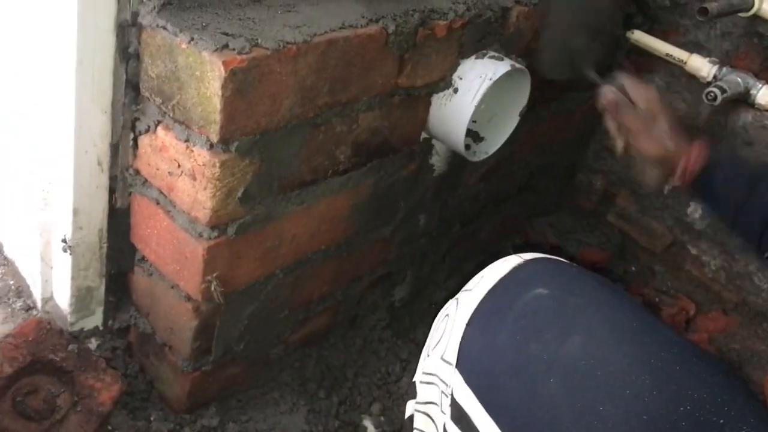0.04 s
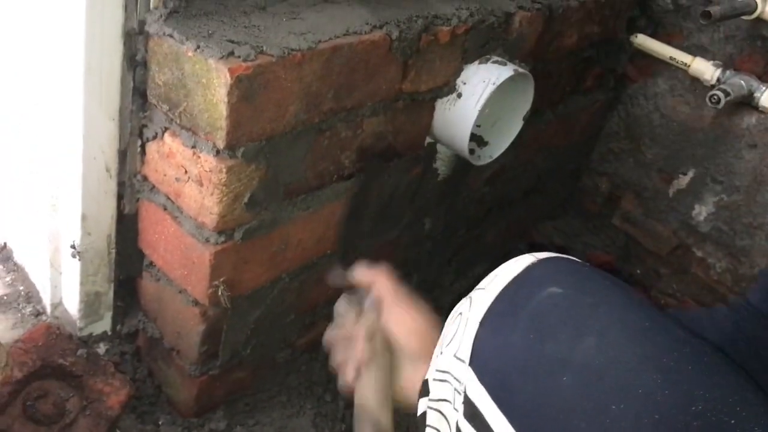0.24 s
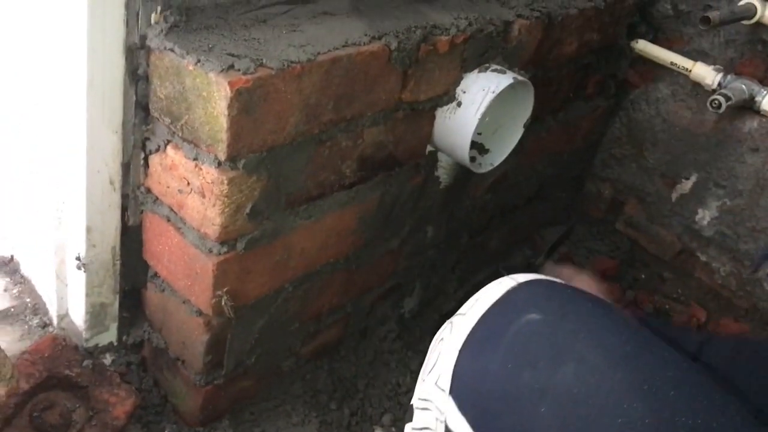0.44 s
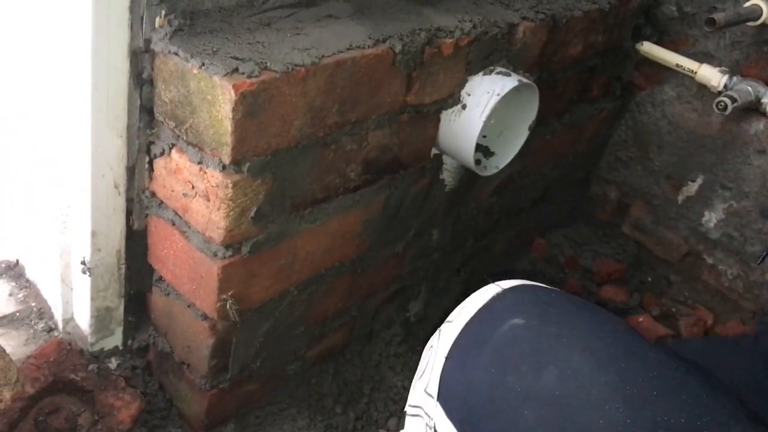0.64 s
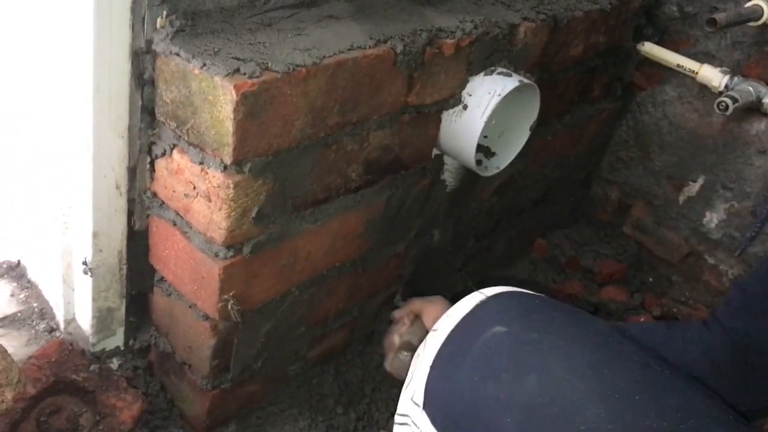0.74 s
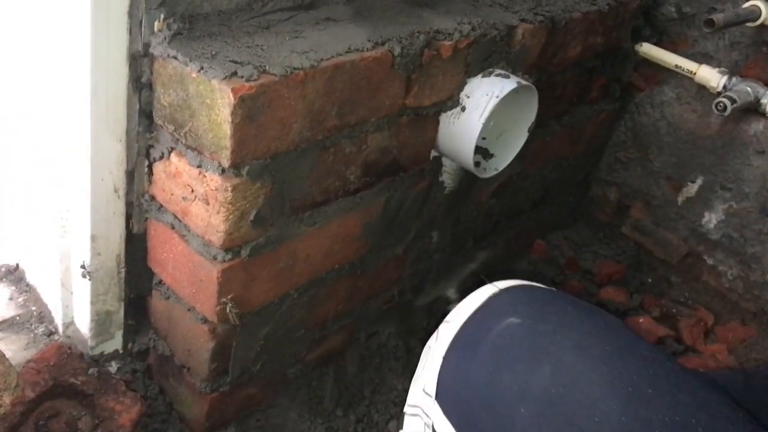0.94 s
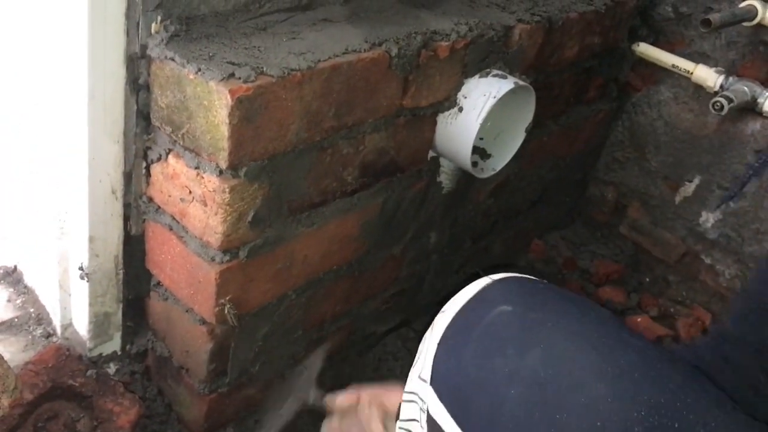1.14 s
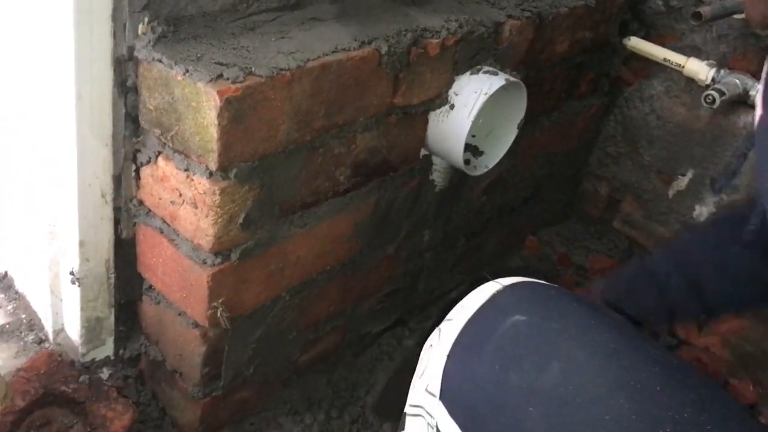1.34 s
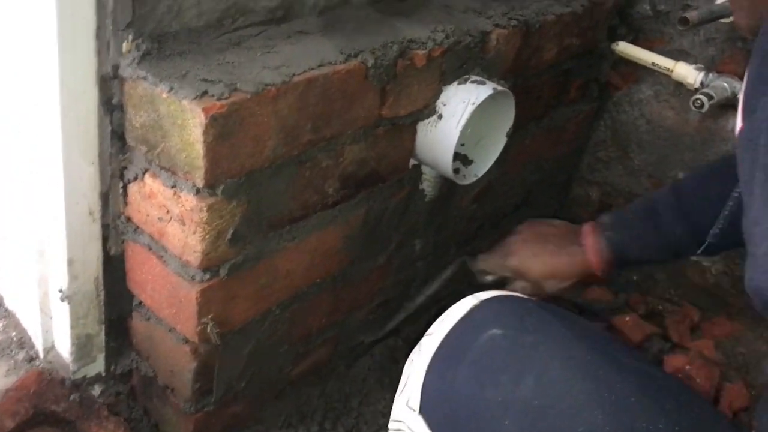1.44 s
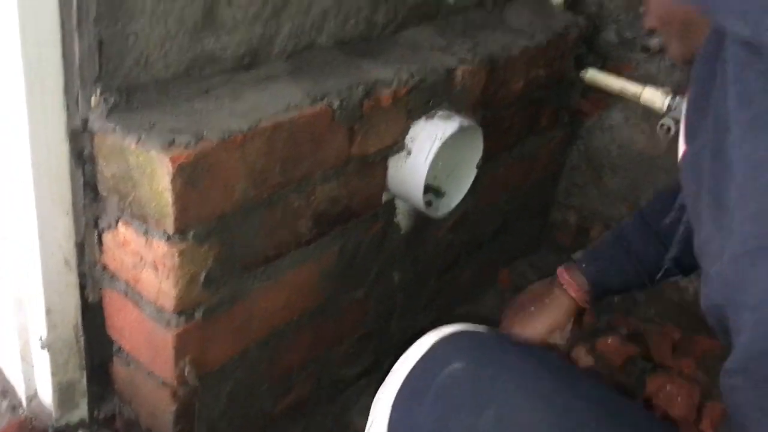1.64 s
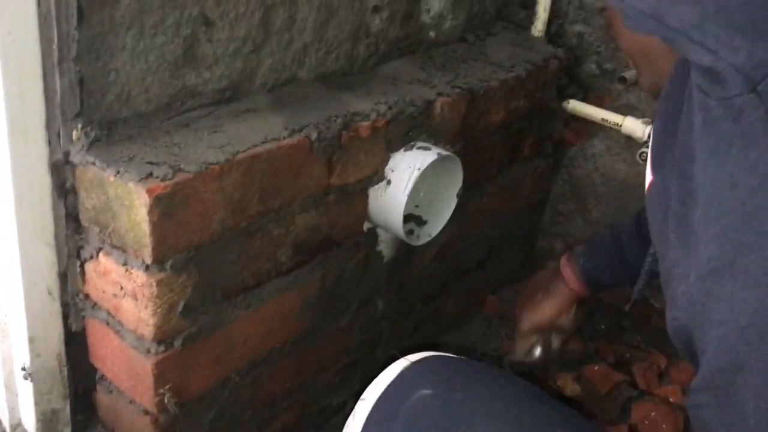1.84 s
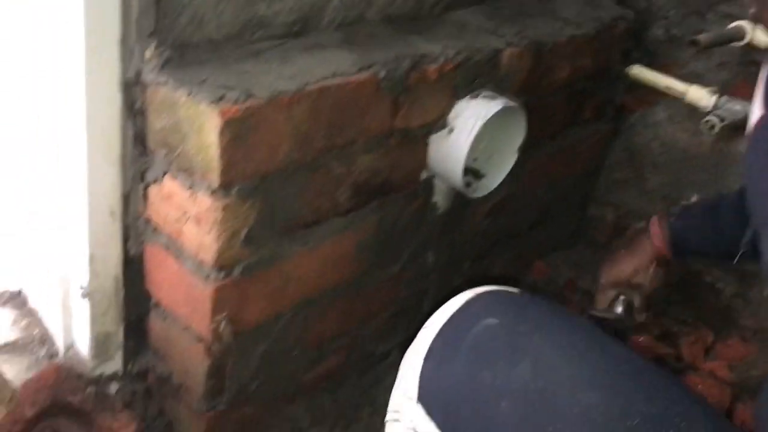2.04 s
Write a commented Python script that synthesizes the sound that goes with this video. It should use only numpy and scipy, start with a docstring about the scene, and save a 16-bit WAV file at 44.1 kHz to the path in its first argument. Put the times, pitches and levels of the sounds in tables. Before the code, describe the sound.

Trowel scraping wet sandy mortar on brick, one loud early stroke, then shorter, fainter scrapes and ticks.

```python
"""In a small bare room, a steel trowel scrapes gritty wet mortar along brickwork in short strokes.
Filtered noise makes the hiss of sand and the body of the mortar; sparse random grains excite the
resonant modes of the blade. Its edge knocks on brick as bursts of noise. Short tones, most of them
rough, swell and die; three in a row step down from 602 to 361 Hz as a falling pitch. Short dull
reverberation follows; a wavering low hum and faint hiss lie beneath."""
import sys
import numpy as np
from scipy import signal
from scipy.fft import rfft, irfft
from scipy.io import wavfile
from scipy.ndimage import uniform_filter1d

SR = 44100
rng = np.random.default_rng(int(sys.argv[2]) if len(sys.argv) > 2 else 0)


def store_pcm(level_fs):
    """Save levels as 16-bit WAV."""
    pcm = np.round(np.clip(level_fs, -1, 1) * 32767).astype(np.int16)
    wavfile.write(sys.argv[1], SR, np.atleast_2d(pcm).T)


N = 92610  # length in samples


def amp(db):
    """Decibels are a logarithm of amplitude: 20 dB is a factor of ten."""
    return 10 ** (np.asarray(db) / 20)


def evened(x):
    """Normalises by root mean square, the measure of signal power."""
    return x / np.sqrt(np.mean(x ** 2) + 1e-20)


def along(table, col):
    """Linear interpolation reads a column of a time table at every sample."""
    rows = np.array(table)
    return np.interp(np.arange(N) / SR, rows[:, 0], rows[:, col])


def smoothed(x, length_s):
    """Two moving averages in series act as a low-pass filter along the last axis."""
    size = max(round(length_s * SR), 1)
    return uniform_filter1d(uniform_filter1d(x, size), size)


def wander(length_s):
    """Low-pass filtered noise is a slow random fluctuation, here of rms 1."""
    return evened(smoothed(rng.standard_normal(N), length_s))


def coloured(x, points, lo_hz, hi_hz):
    """Spectral weighting shapes x; the part between lo_hz and hi_hz has rms 1."""
    hz = np.fft.rfftfreq(N, 1 / SR)
    point_hz, point_db = np.transpose(points)
    weight_db = np.interp(np.log(hz + 1), np.log(point_hz + 1), point_db, left=-60)
    spectrum = rfft(x) * amp(weight_db)
    band = irfft(spectrum * ((hz > lo_hz) & (hz < hi_hz)), N)
    return irfft(spectrum, N) / np.sqrt(np.mean(band ** 2))


def resonate(x, hz, width):
    """A damped oscillator is a pole pair whose radius sets the bandwidth (width in Hz)."""
    r = np.exp(-np.pi * width / SR)
    angle = 2 * np.pi * hz / SR
    return signal.lfilter([1 - r], [1, -2 * r * np.cos(angle), r * r], x) * 2 * np.sin(angle)


def add(mix, s, sound):
    """Superposition: sounds sum linearly, this one from s seconds on."""
    part = mix[round(s * SR):][:len(sound)]
    part += sound[:len(part)]


def background():
    """Frequency modulation wavers a low hum; narrow-band noise blurs it and its overtone, over hiss."""
    # Each row: time in seconds, hum level in dB, overtone level relative to the hum tone in dB.
    hum_levels = [(0, -55.5, 12), (.06, -57, -21), (.13, -83, 16), (.23, -59.5, -2), (.32, -75.5, 17),
                  (.75, -65, -31), (1.3, -70.5, -9), (1.68, -61, -3.5), (1.94, -62.5, -9.5),
                  (2.1, -69.5, 4)]
    # Spectrum of the faint hiss. Each row: frequency in Hz, relative density in dB per Hz.
    air_spectrum = [(30, 0), (60, -9.5), (140, -3.5), (300, -7.5), (1730, -17), (3500, -23), (5910, -26.5),
                    (14000, -33.5)]
    hum_hz, waver_hz, waver_s = 116.2, 10.33, 0.023  # centre, rms deviation, smoothing time
    fuzz_db, fuzz_width_hz = -4, 28  # relative to the hum tone
    overtone_hz, overtone_width_hz = 220, 17.5
    air_db = -65.5  # rms between 193 and 16000 Hz
    air_noise, fuzz_noise, overtone_noise = rng.standard_normal((3, N))
    phase = 2 * np.pi * np.cumsum(hum_hz + waver_hz * wander(waver_s)) / SR
    tone = np.sqrt(2) * np.sin(phase)
    fuzz = amp(fuzz_db) * evened(resonate(fuzz_noise, hum_hz, fuzz_width_hz))
    overtone = evened(resonate(overtone_noise, overtone_hz, overtone_width_hz))
    hum = tone + fuzz + amp(along(hum_levels, 2)) * overtone
    air = amp(air_db) * coloured(air_noise, air_spectrum, 193, 16000)
    return air + amp(along(hum_levels, 1)) * hum


def pressure():
    """Friction noise exists only during contact: gives its level in dB, sudden at each touch."""
    # One table per stroke, from the touch of the blade.
    # Each row: time in seconds, level of the grit hiss in dB.
    strokes = [
        [(0, -69.5), (.035, -65), (.05, -54), (.068, -66.5), (.085, -74), (.161, -67)],
        [(.1615, -52), (.205, -46), (.215, -46.5), (.245, -45.5), (.26, -42.5), (.295, -45.5), (.33, -69.5),
         (.39, -81.5)],
        [(.5605, -59.5), (.59, -66), (.597, -59), (.612, -51), (.65, -55.5), (.665, -63.5), (.71, -59.5),
         (.742, -66), (.77, -57), (.83, -55.5), (.837, -53.5), (.855, -45), (.875, -48), (.905, -54.5),
         (.935, -68.5), (.97, -80)],
        [(1.014, -70.5), (1.038, -70)],
        [(1.0415, -60.5), (1.06, -52.5), (1.085, -47.5), (1.135, -60.5), (1.175, -75.5)],
        [(1.368, -78), (1.392, -73), (1.43, -79.5), (1.47, -78), (1.495, -83)],
        [(1.497, -73), (1.518, -63.5), (1.535, -72), (1.545, -67), (1.5765, -77)],
        [(1.577, -70), (1.6, -61), (1.614, -56), (1.635, -54.5), (1.665, -73.5), (1.7, -91)],
        [(1.748, -66.5), (1.81, -69.5), (1.8335, -62)],
        [(1.834, -50.5), (1.845, -57), (1.86, -63), (1.91, -91.5)],
        [(1.947, -65.5), (1.975, -74), (2.0105, -71.5)],
        [(2.011, -63), (2.022, -61), (2.036, -66), (2.07, -84)],
    ]
    t, db = np.arange(N) / SR, np.full(N, -120.)
    for stroke in strokes:
        s, level = np.transpose(stroke)
        db = np.maximum(db, np.interp(t, s, level, left=-120, right=-120))
    return db


def grains(per_s):
    """Shot noise: sand grains break loose at random instants, a few of them large."""
    spread_db = 1.0
    size = amp(spread_db * np.minimum(rng.exponential(1, N), 4))
    breaks_loose = rng.random(N) < per_s / SR
    return evened(size * rng.standard_normal(N) * breaks_loose)


def blade(push, lo_hz, hi_hz):
    """Modal excitation: each mode's drive varies as the point of contact moves along the steel."""
    # Modes of the steel. Each row: frequency in Hz, relative drive in dB.
    steel_modes = [(1850, -3.5), (2050, 1.5), (2300, -5.5), (2450, -2.5), (2700, -16.5), (2840, -2),
                   (3390, -15), (3900, -11.5), (4745, -3), (5750, -8), (6430, -7.5), (6920, -7)]
    # Decay, shorter while pressed or loaded with mortar; first row free, last row loaded.
    # Each row: time in seconds, time to fall 60 dB in seconds.
    blade_decay = [(0, .09), (.16, .02), (.25, .03), (.31, .09), (.55, .035), (1.3, .018)]
    wander_db, wander_s = 3.2, .015  # rms variation of each drive and its smoothing time
    ring_share = 0.76  # amplitude share of ringing; the rest is band-passed push
    modes = [m for m in steel_modes if lo_hz < m[0] < hi_hz]
    free, loaded = blade_decay[0][1], blade_decay[-1][1]
    freedom = np.clip((along(blade_decay, 1) - loaded) / (free - loaded + 1e-9), 0, 1)
    ring = 0
    for hz, db in modes:
        drive = push * amp(db + wander_db * wander(wander_s) - wander_db)
        for t60, part in ((free, freedom), (loaded, 1 - freedom)):
            width = np.log(1000) / np.pi / t60
            level = np.sqrt(t60 * SR / np.log(1000))  # offsets the lower power of a narrow band
            ring = ring + resonate(drive * np.sqrt(part), hz, width) * level
    sos = signal.butter(3, [lo_hz, hi_hz], "bandpass", fs=SR, output="sos")
    direct = signal.sosfilt(sos, push) * np.sqrt(SR / 2 / (hi_hz - lo_hz))
    return ring_share * ring / np.sqrt(len(modes)) + (1 - ring_share) * direct


def patchy(x, db, size):
    """Time-varying filtering: colour shifts in random patches of time and pitch as contact moves."""
    overlap = size - size // 4
    z = signal.stft(x, nperseg=size, noverlap=overlap)[2]
    field = rng.standard_normal(z.shape[::-1]).T
    field = uniform_filter1d(field, size=3, axis=0)  # across frequency
    field = uniform_filter1d(field, size=8, axis=1)  # across time
    gain = amp(db * evened(field))
    return signal.istft(z * evened(gain), nperseg=size, noverlap=overlap)[1][:N]


def scrape():
    """Friction excitation: grains hiss, shake the blade's modes and the lump of mortar."""
    # Spectra of the hiss and of the mortar. Each row: frequency in Hz, relative density in dB per Hz.
    grit_spectrum = [(2500, -3.5), (4200, -9.5), (5600, -3), (9800, -10), (13100, -8.5), (15600, -11)]
    mortar_spectrum = [(150, -8), (296, 0.5), (436, 3), (616, 7.5), (770, -2), (934, 3), (1290, 7.5),
                       (1700, -20.5), (2210, -55)]
    # What the grit shakes. Each row: time in seconds, then levels relative to the hiss in dB of
    # the upper blade drive, the lower blade drive and the mortar body.
    shaken = [(0, -13, 1.5, 17.5), (.05, 5.5, 3, 2.5), (.14, -4, 13, 11), (.17, 13.5, 5, -5),
              (.21, 5, 5, -8.5), (.23, 9, 12, 1), (.26, 7, 8.5, -16), (.3, 14.5, 4.5, 1),
              (.34, 17.5, 17, 5.5), (.56, 9, 4, 3), (.62, 5, 11, -2.5), (.7, 6.5, 7, 0), (.77, -1, 5.5, -5),
              (.82, 7, 12, -14), (.85, -4, 3, -34), (.88, 12.5, 12.5, -2), (1.02, -19, 5, 1),
              (1.08, 6.5, -0.5, -16.5), (1.14, -12, -9, -8), (1.4, 2, 11.5, 4.5), (1.51, 13.5, 9.5, 1),
              (1.57, 3, 13, -2), (1.62, 8, 10.5, 3), (1.76, -9, 8.5, -9), (1.82, -7, 14.5, -1),
              (1.85, -29, 11, 4.5), (1.9, -14, 17.5, 19), (1.96, -3, 2, -4), (2.02, 3, 9, 3)]
    grains_per_s, stones_per_s = 22000, 1500  # stones: the coarser grains that jolt the blade
    split_hz = 3750  # between lower and upper blade modes
    hiss_patch_db, body_patch_db = 3, 1.5  # rms unevenness of colour
    hiss_db = pressure()
    hiss = coloured(grains(grains_per_s), grit_spectrum, 7500, 15000)
    out = amp(hiss_db) * patchy(hiss, hiss_patch_db, size=256)
    upper_push = amp(hiss_db + along(shaken, 1)) * grains(2 * stones_per_s)
    out += blade(upper_push, split_hz, 7300)
    lower_push = amp(hiss_db + along(shaken, 2)) * grains(stones_per_s)
    out += blade(lower_push, 1500, split_hz)
    body_level = uniform_filter1d(amp(hiss_db + along(shaken, 3)), 200)  # softened over 200 samples
    body = coloured(grains(grains_per_s), mortar_spectrum, 280, 1400)
    return out + body_level * patchy(body, body_patch_db, size=512)


def short_tones():
    """Amplitude and phase modulation by noise roughens tones that swell, hold and die exponentially."""
    # Three rows in succession, at 602, 416.7 and 361.4 Hz, step down as a falling pitch.
    # Each row: start in seconds, time before the decay in seconds, frequency in Hz, rms level
    # before the decay in dB, time to fall 60 dB in seconds, roughness from 0 to 1.
    tones = [(.04, 0.0082, 2850, -53, 0.11, 0.14), (0.038, 0.0059, 4740, -57, 0.052, 0.3),
             (.05, 0.073, 915, -63.5, 0.23, 0.1), (.166, 0.019, 384, -52.5, 0.088, 0.36),
             (.19, 0.019, 602, -46.5, 0.044, 0.67), (.243, 0.028, 416.7, -47.5, 0.058, 0.55),
             (.276, 0.022, 361.4, -49.5, 0.097, 0.27), (0.233, 0.062, 2793, -39.5, 0.086, 0.88),
             (.263, 0.032, 6450, -36.5, 0.079, 0.9), (.29, 0.056, 916, -51, 0.14, 0),
             (.29, 0.039, 587, -54.5, 0.38, 0.25), (.30, 0.021, 4660, -46.5, 0.036, 0),
             (.29, 0.035, 5840, -51.5, 0.13, 1), (0.34, 0.036, 1734, -50, 0.11, 0),
             (.561, 0.018, 2767, -55.5, 0.12, 0.6), (.605, 0.031, 1327, -56.5, 0.048, 0.3),
             (.606, 0.015, 2125, -63, 0.062, 0.6), (0.609, 0.027, 2577, -47.5, 0.11, 0.6),
             (.865, 0.022, 406.6, -46.5, 0.33, 0.42), (.905, 0.035, 915, -63.5, 0.23, 0.05),
             (.862, 0.02, 2450, -45.5, 0.13, 0.43), (.89, 0.04, 1305, -56.5, 0.088, .2),
             (1.37, 0.057, 1254, -70, .1, 0.77), (1.5, 0.013, 5000, -61, 0.055, 0.8),
             (1.51, 0.019, 2397, -58, 0.071, 0.5), (1.608, 0.034, 1883, -51.5, .05, 0.98),
             (1.838, 0.024, 821, -54.5, 0.051, 0.8), (1.625, .03, 1297, -58, 0.1, 0.65),
             (1.86, 0.032, 150.5, -57, 0.19, 0.34), (2.018, 0.014, 1222, -55.5, 0.057, 0.84)]
    rise_s, grain_s = 0.0028, 0.0022  # onset; smoothing time of the roughness
    out, t = np.zeros(N), np.arange(SR // 2) / SR
    for s, hold, hz, db, t60, rough in tones:
        a, b = smoothed(rng.standard_normal((2, len(t))), grain_s)
        noise = (evened(a) + 1j * evened(b)) / np.sqrt(2)
        waver = np.sqrt(1 - rough ** 2) + rough * noise  # complex, so both level and phase waver
        shape = np.minimum(t / rise_s, 1) * amp(db - 60 * np.maximum(t - hold, 0) / t60)
        carrier = np.exp(2j * np.pi * (hz * t + rng.random()))
        add(out, s, np.sqrt(2) * shape * (waver * carrier).real)
    return out


def knocks():
    """Impact excitation: the edge strikes brick with a tick and a short crunch around one pitch."""
    # Each row: time in seconds, level before the common gain in dB, pitch in Hz.
    strikes = [(0.2138, -26, 4600), (0.225, -21, 3270), (0.2367, -22, 2880), (0.563, -56, 2680),
               (0.6089, -48, 2180), (0.7041, -39, 1800), (.837, -33.5, 4230), (0.855, -24.5, 2880),
               (0.8737, -32, 2700), (1.0736, -33, 3850), (1.576, -42, 2290), (1.748, -55.5, 1930),
               (1.789, -49, 2700), (1.8159, -42.5, 1900), (1.8338, -34.5, 2240), (1.947, -48, 2840),
               (2.013, -43.5, 3020)]
    rise_s, crunch_t60, tick_t60 = 0.00074, .035, 0.03  # seconds
    common_db, tick_db = -6, -16  # gain of all knocks; gain of the tick's noise within each
    width_hz = 1000
    out, t = np.zeros(N), np.arange(2000) / SR
    for s, db, hz in strikes:
        noise = np.diff(rng.standard_normal((2, len(t))), prepend=0)  # differencing brightens it
        tick, crunch = noise * np.minimum(t / rise_s, 1)
        tick = tick * amp(tick_db - 60 * t / tick_t60)
        crunch = evened(resonate(crunch, hz, width_hz)) * amp(-60 * t / crunch_t60)
        add(out, s, amp(db + common_db) * (tick + crunch))
    return out


def room(x):
    """Reverberation is convolution with decaying noise: close brick walls give a short, dull tail."""
    level_db, t60, dull_hz = -14.5, 0.12, 5350  # tail gain, seconds to fall 60 dB, low-pass corner
    t = np.arange(SR // 2) / SR
    tail = rng.standard_normal(len(t)) * amp(-60 * t / t60) * (t > .003)  # starts after 3 ms
    tail = signal.lfilter(*signal.butter(1, dull_hz, fs=SR), tail)
    return x + amp(level_db) * signal.fftconvolve(x, tail / np.linalg.norm(tail))[:N]


def scene():
    """Superposition: the trowel's sounds share the room; the background is added without its tail."""
    trowel = scrape() + short_tones() + knocks()
    return (room(trowel) + background())[None]


def record(dry):
    """Band limitation: a high-pass removes the deep bass below the scrape and hum; a low-pass cuts the top."""
    low_cut_hz, edge_hz = 72, 15680
    sos = signal.butter(N=3, Wn=low_cut_hz, btype="high", fs=SR, output="sos")
    thin = signal.sosfilt(sos, dry)
    low_pass = signal.firwin(511, edge_hz, window=("kaiser", 9), fs=SR)
    return signal.oaconvolve(thin, low_pass[None], "same")


dry = scene()
out = record(dry)
store_pcm(out)
```